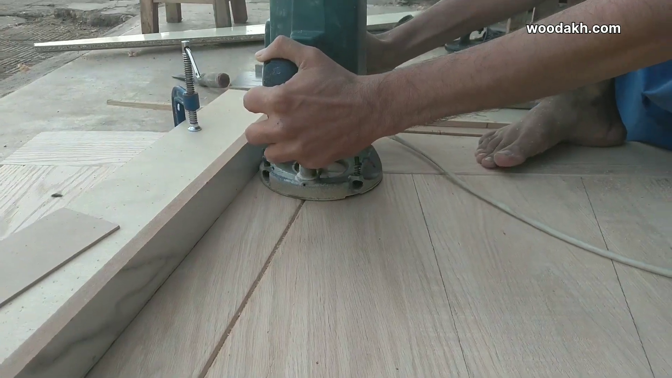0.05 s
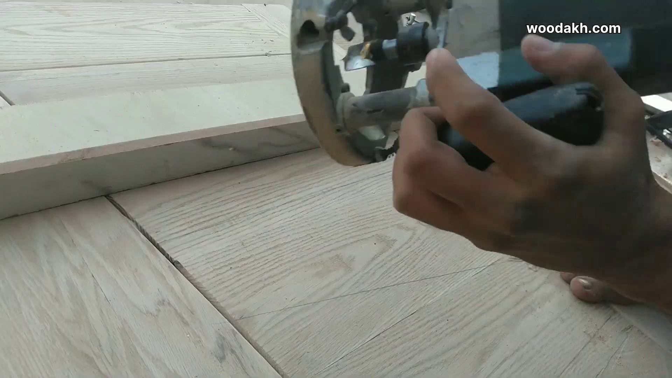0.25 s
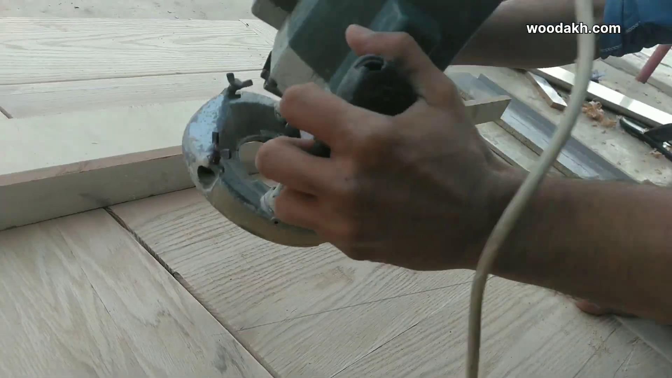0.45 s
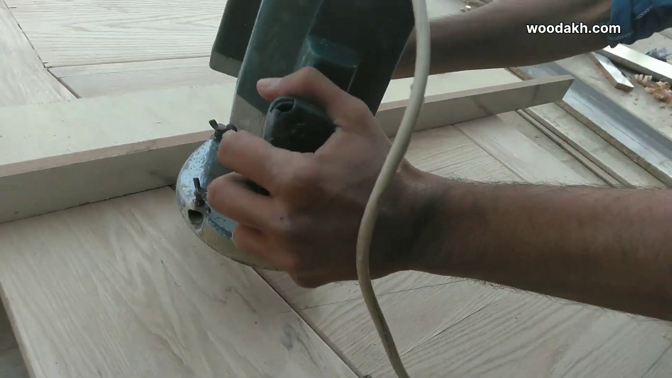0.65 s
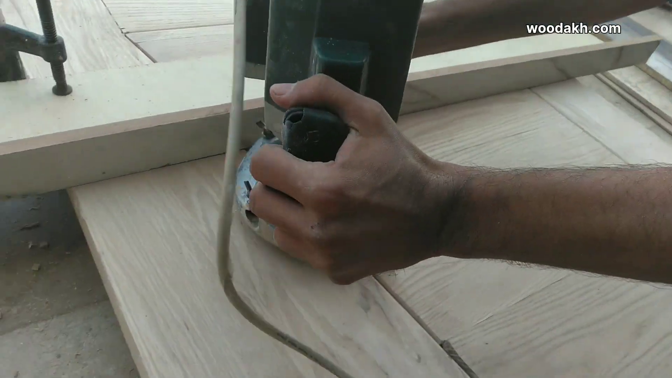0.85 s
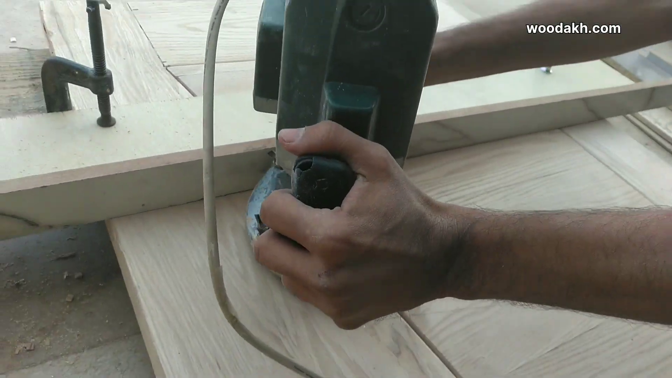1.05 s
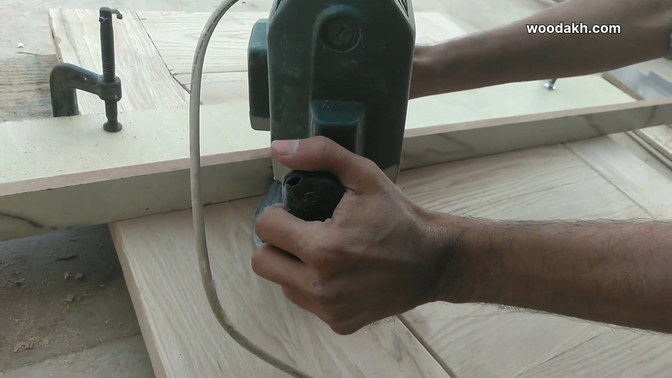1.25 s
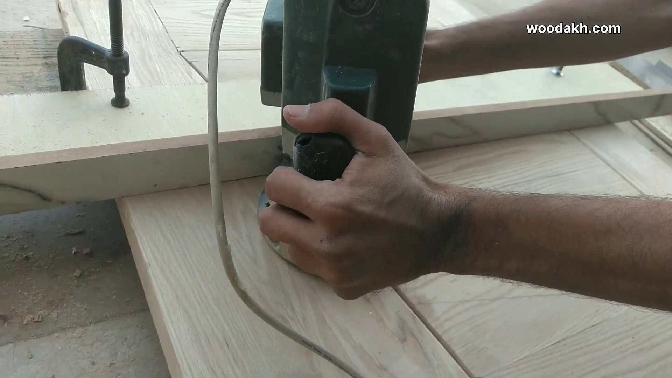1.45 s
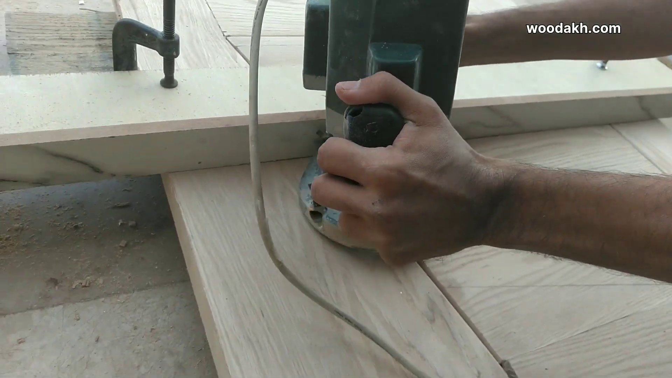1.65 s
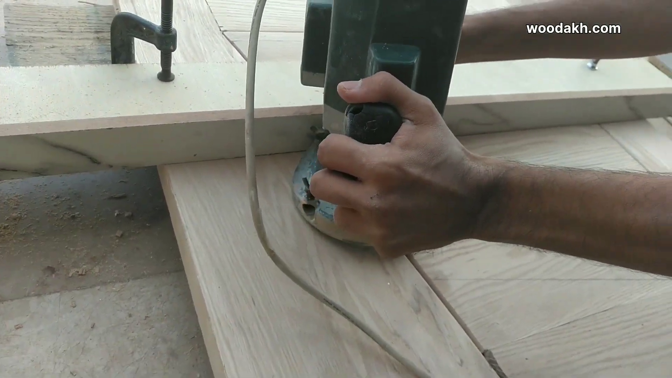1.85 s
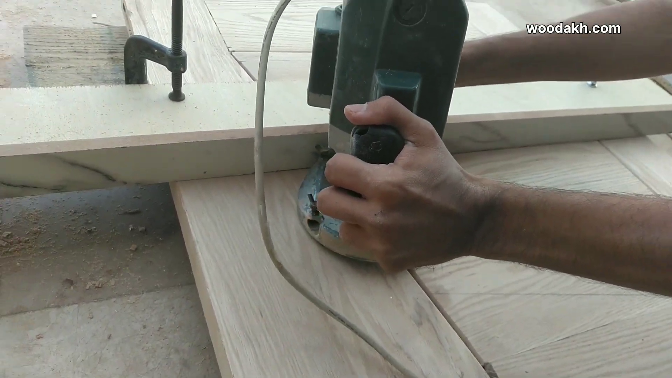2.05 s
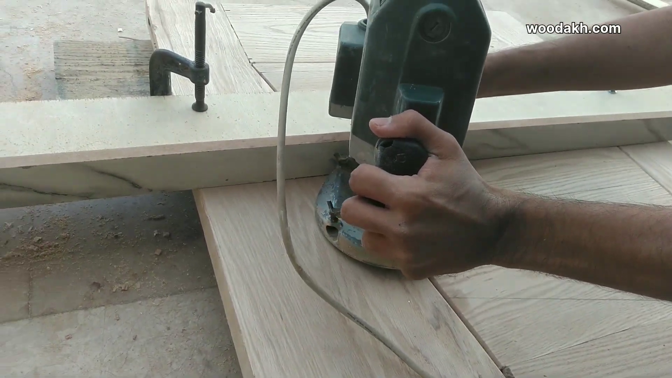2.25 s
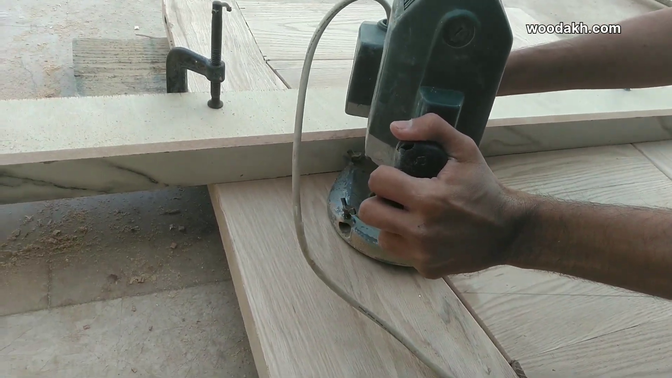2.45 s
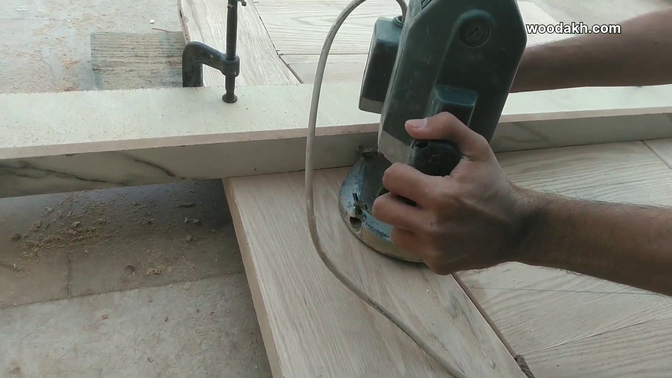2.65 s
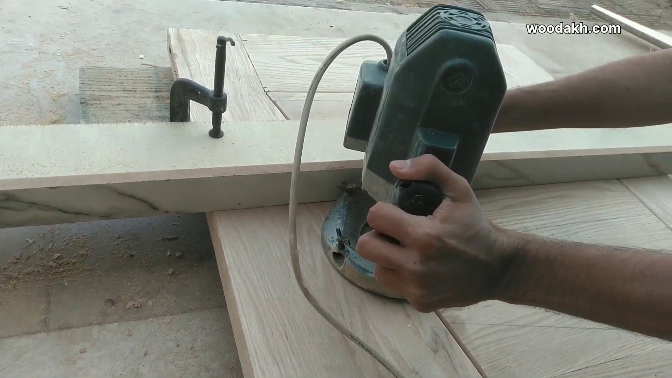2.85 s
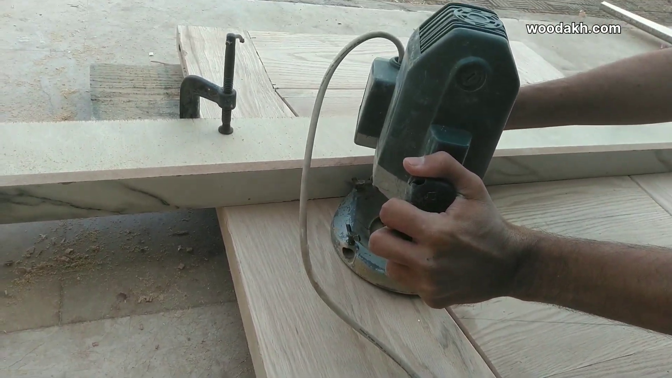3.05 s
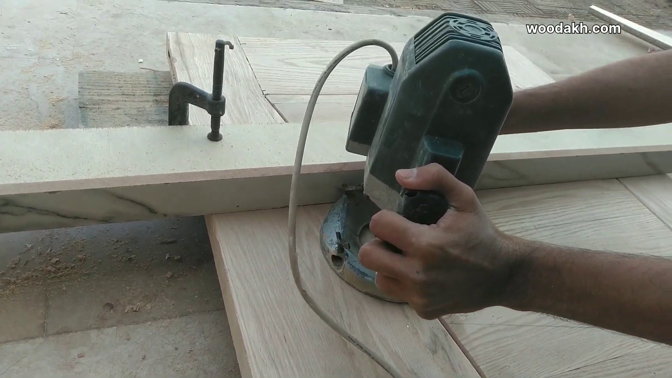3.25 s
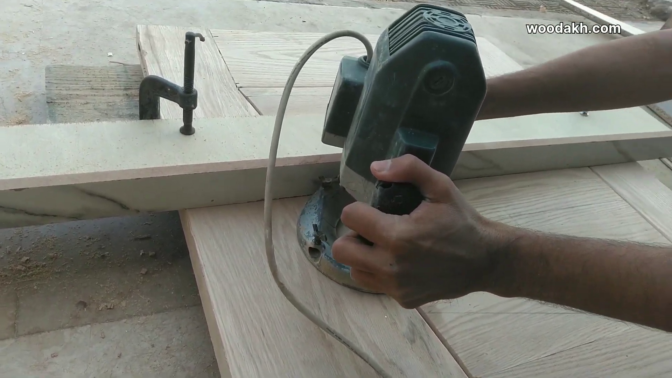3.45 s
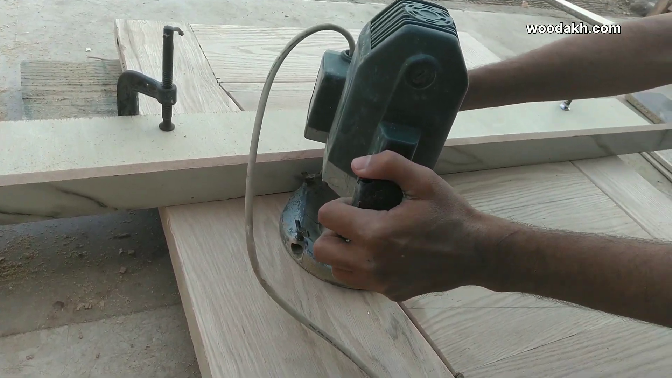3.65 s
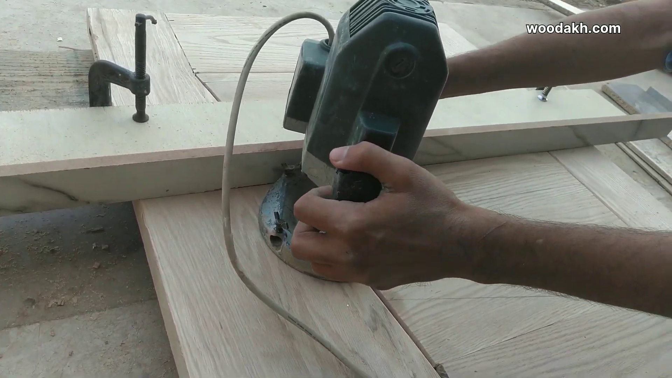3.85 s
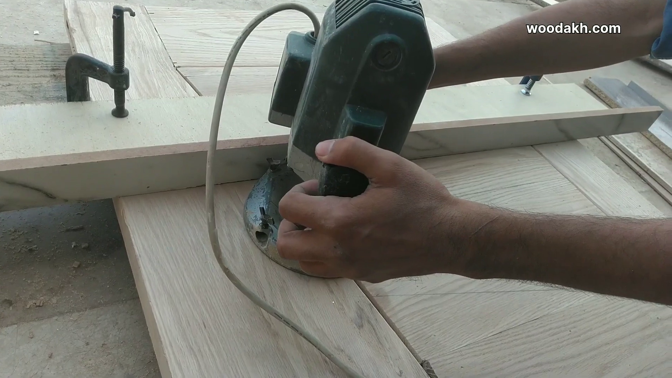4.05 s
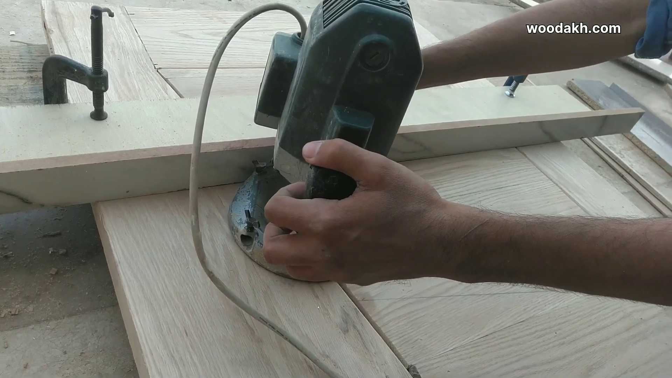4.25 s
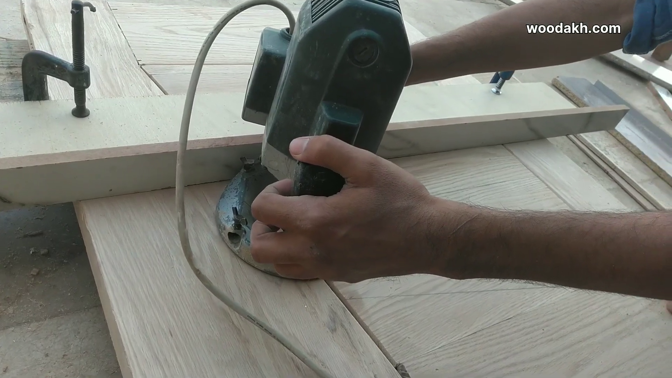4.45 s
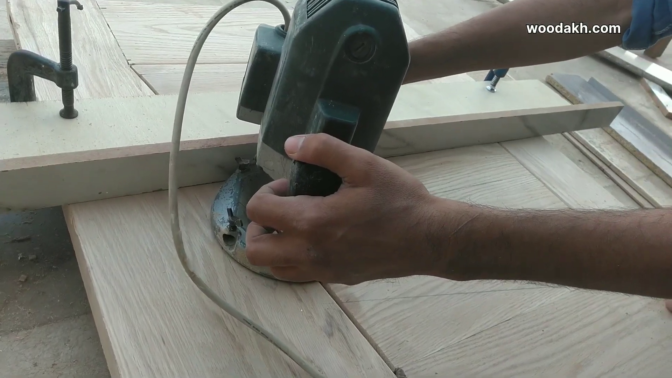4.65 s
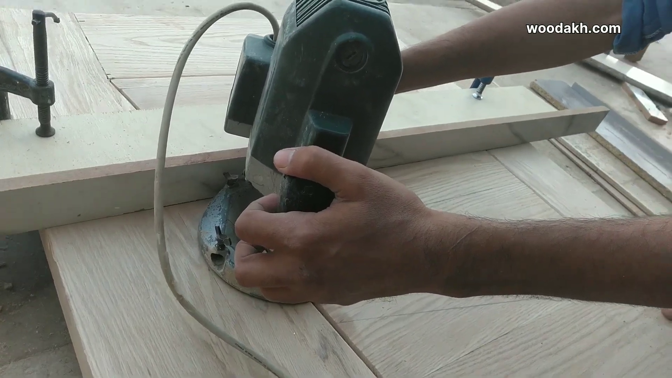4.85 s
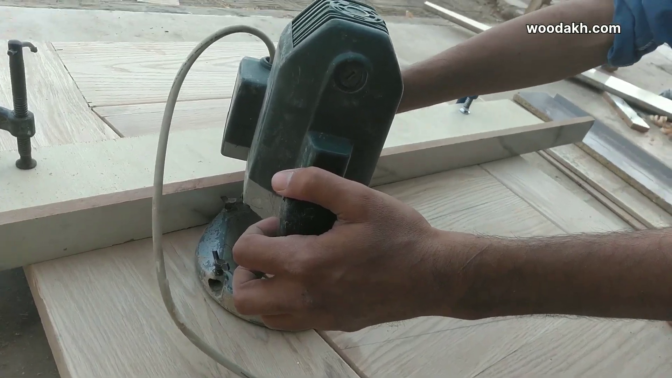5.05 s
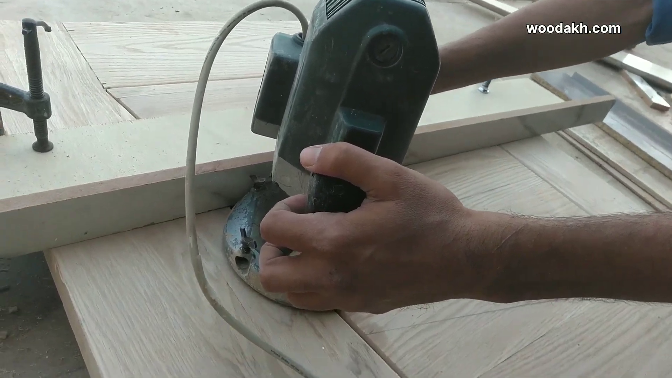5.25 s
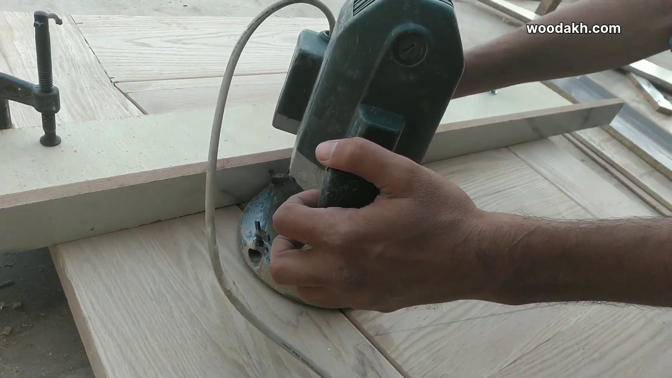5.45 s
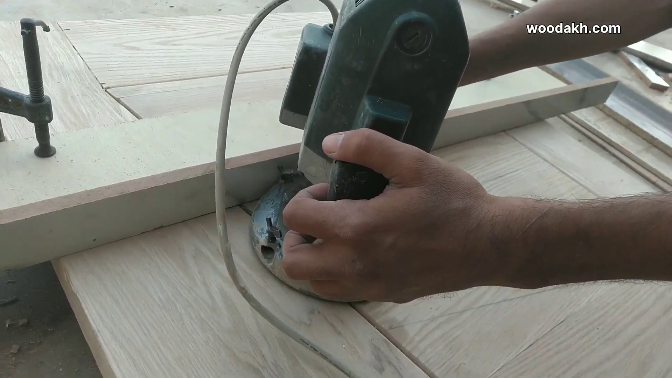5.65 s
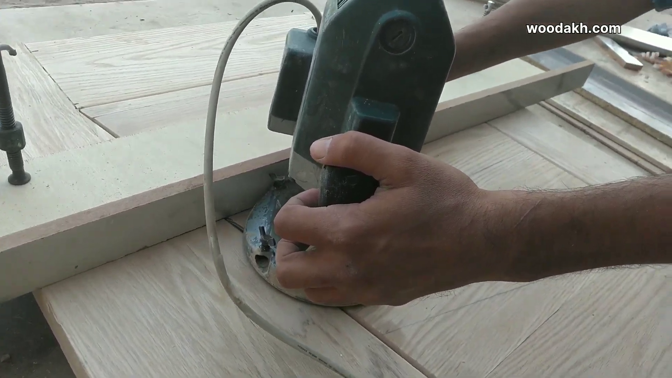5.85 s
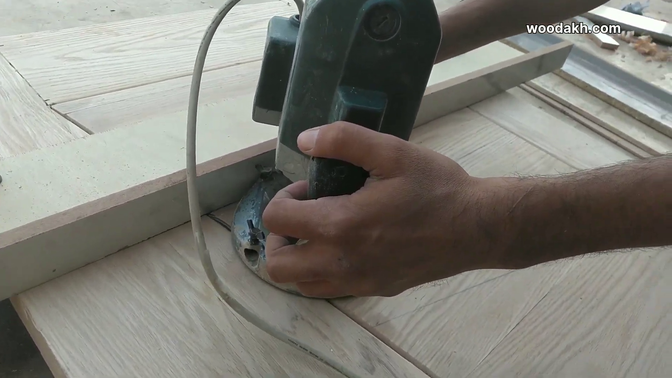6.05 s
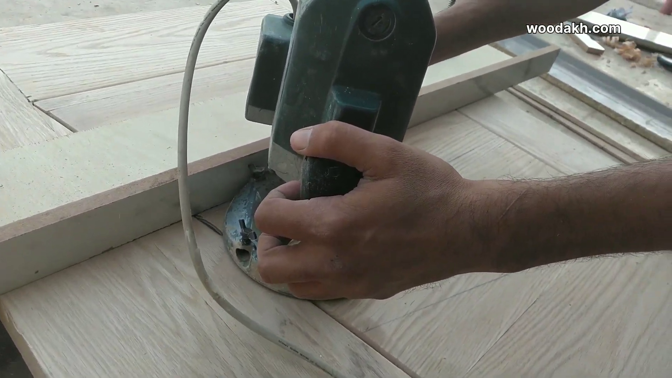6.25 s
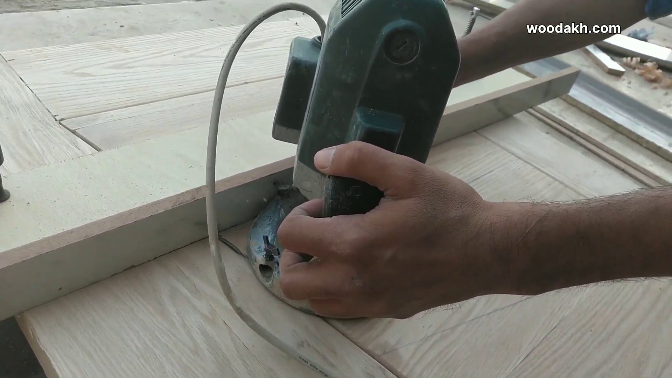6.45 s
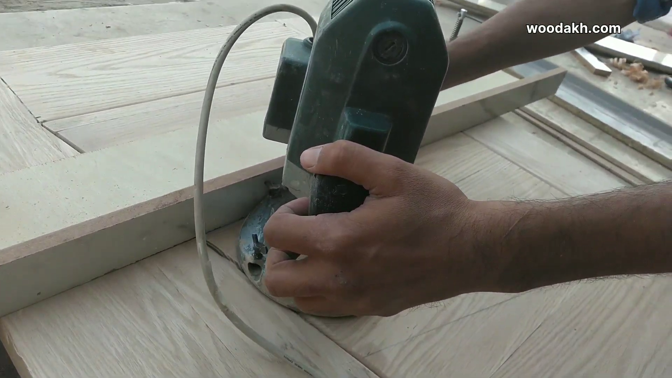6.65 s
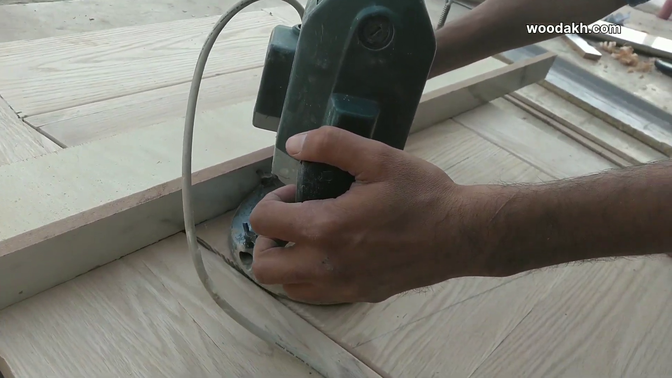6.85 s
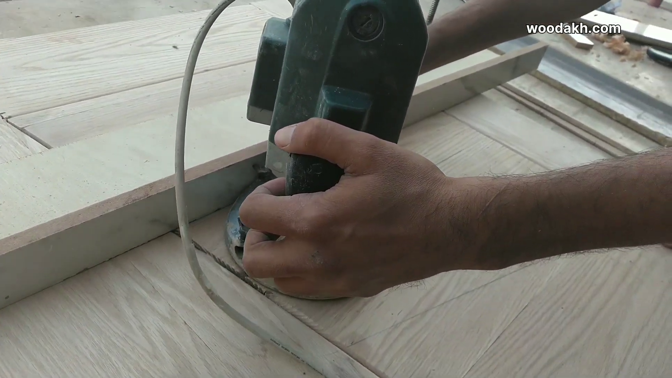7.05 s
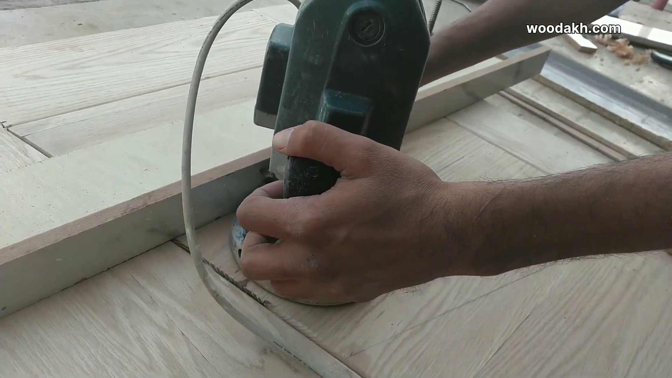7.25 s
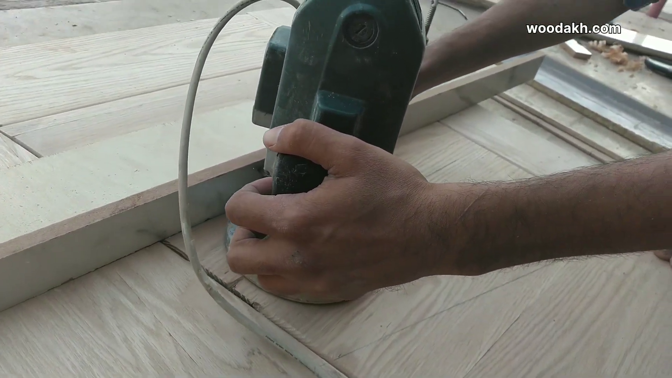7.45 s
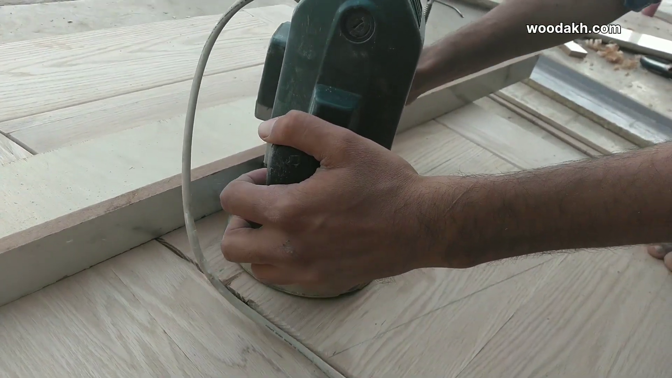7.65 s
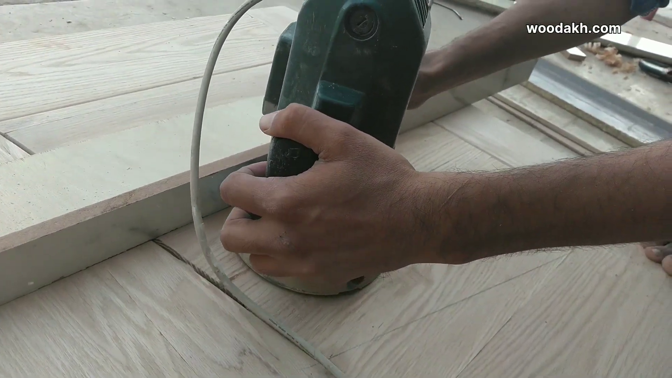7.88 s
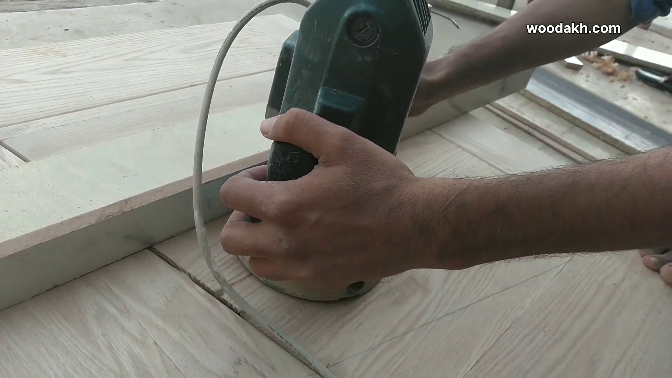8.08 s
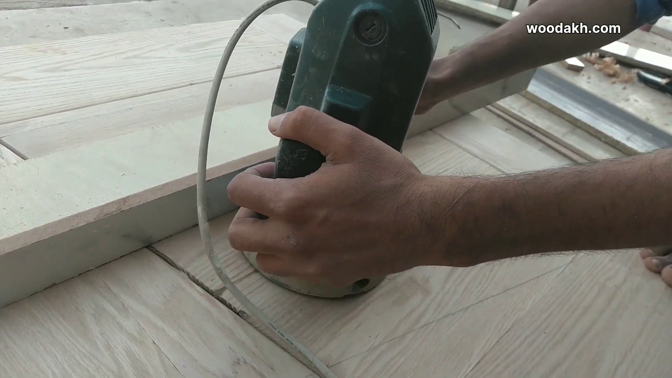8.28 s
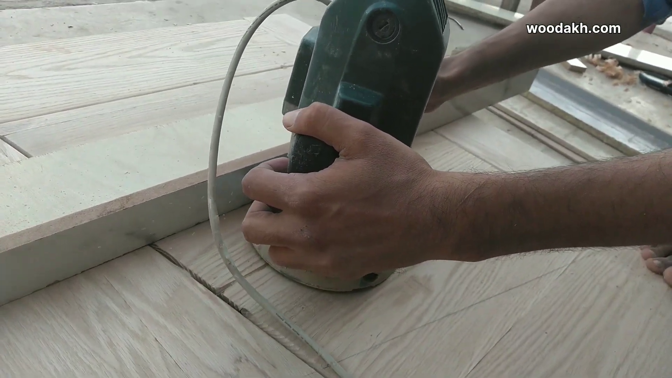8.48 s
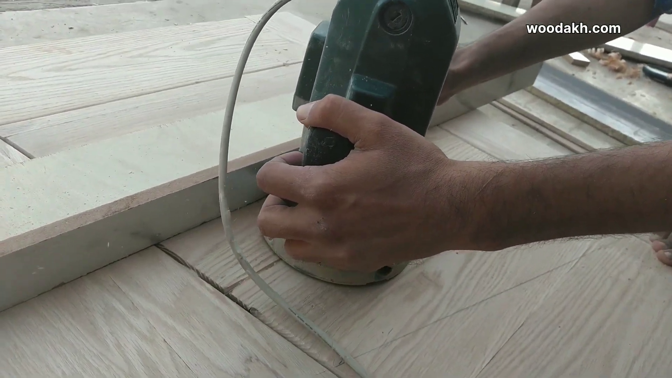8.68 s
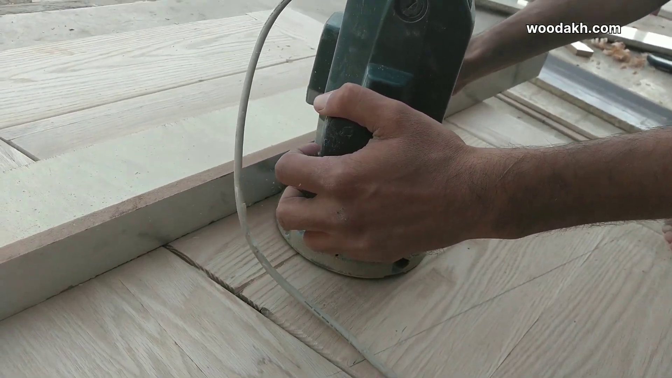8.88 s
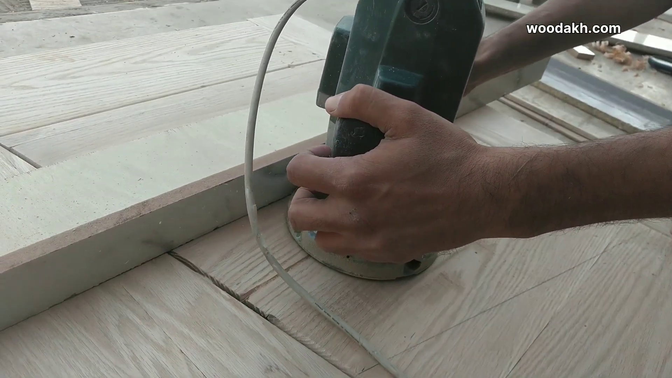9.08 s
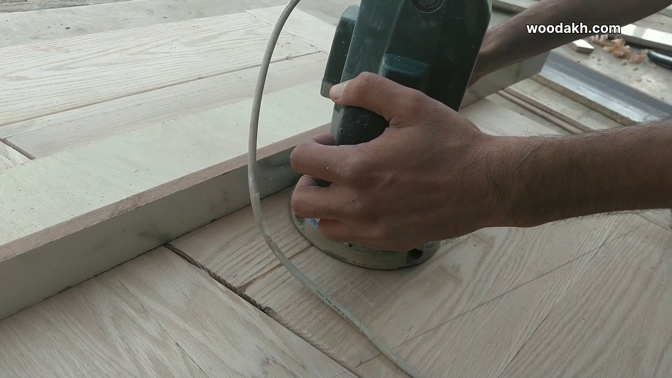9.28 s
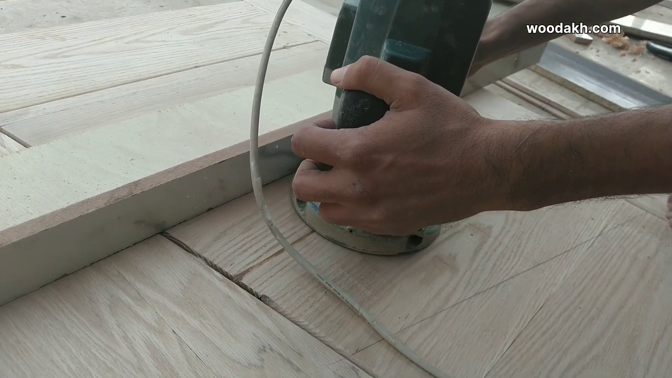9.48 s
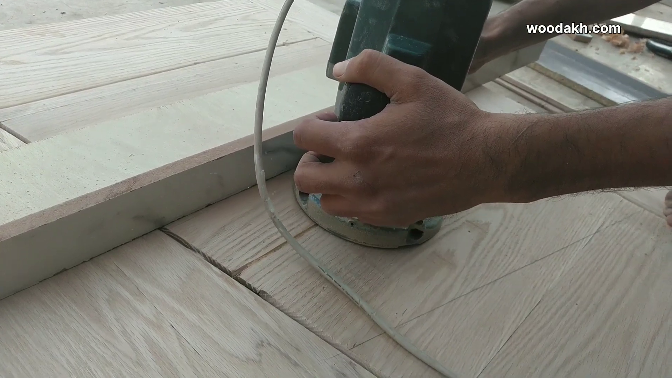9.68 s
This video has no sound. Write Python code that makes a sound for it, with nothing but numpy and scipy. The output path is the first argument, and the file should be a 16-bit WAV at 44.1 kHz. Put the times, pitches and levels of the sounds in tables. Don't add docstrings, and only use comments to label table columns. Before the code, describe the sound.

A fraction of a second of loud running router cuts abruptly to a quiet outdoor yard with low rumble and soft air. The base scrapes and knocks on a board, a switch clicks, and the motor spins up quickly to a harsh whine with rushing fan air. It plunges into wood, gains a buzzing edge, then grooves steadily while its pitch slowly sags. Close stereo microphones.

```python
import sys
import numpy as np
from scipy import signal
from scipy.fft import rfft, irfft, next_fast_len
from scipy.io import wavfile
from scipy.ndimage import uniform_filter1d, map_coordinates

SR = 44100
rng = np.random.default_rng(int(sys.argv[2]) if len(sys.argv) > 2 else 0)


def gain_from_decibels(decibels):
    exponent = np.asarray(decibels, float) / 20
    return 10 ** exponent


def pcm_store(signal):
    levels = np.round(np.clip(np.atleast_2d(signal), -1, 1) * 32767)
    wavfile.write(sys.argv[1], SR, levels.astype(np.int16).T)


N = 428652
TIME = np.arange(N) / SR

CUT_S, START_S = 0.236, 1.691
PLUNGE_FROM_S, PLUNGE_IN_S, PLUNGE_OUT_S, GROOVE_S = 3.273, 3.4, 3.71, 4.35
BALL_PASS = 3.655


# missing_turns_per_s, time_constant_s
RUN_UP = [(183.5, .73), (140, .11)]
# time_s, lost_turns_per_s
LOAD_SAG = [(0, 7.7), (.24, 6.8), (1.69, 0), (3.3, 0), (3.5, 2.4), (3.75, 4.9), (4.0, 5.9), (4.3, 6.1),
            (5.2, 4.9), (5.8, 4.5), (6.4, 6.1), (7.0, 8.6), (7.6, 10.7), (8.2, 11.4), (8.8, 13.1),
            (9.1, 15.1), (9.72, 19.2)]
LEFT_SHIFT = [
    (.12, .13, .13, .125, .013),
    (-1, -3.4, -1.76, -1.8, .2),
]
# time_s, turn_rad, half_length_s
SIXTH_SWINGS = [
    (3.36, -1, .1),
    (9.5, 3.4, .6),
]
BEAT_DB = [
    (-18.5, -23.5, -45, -31, 0.52),
    (-29, -28, -27.5, -24, 0.12),
    (-33, -41, -34.5, -26.5, 0.67),
    (-24, -35.5, -29, -29, 2.5),
]
BEAT_PAN = [
    (6, 5, 3, 10.5, -0.9),
    (-3, 6, 6.3, 4.8, -0.8),
    (7, 8, 5.5, 10.7, -0.45),
    (-4, 7, 11.4, 1.1, 0.6),
]
BEAT_PHASE = [
    (0, 0, 1.1, 0, .03),
    (0, 1.4, 2, 0.55, -0.046),
    (0, 0, 0, 0, -.06),
    (0, 0.14, 0, -0.12, 0.0055),
]
BEAT_GROWTH = [55, 95, 40, 40]
BEAT_SWELLS = {1: [(1.93, 10, 0.066), (2.06, -12, .04), (2.75, 2.5, 0.32), (3.2, -5, 0.17),
               (4.35, 0.5, 0.13), (6.5, -4, 1)], 2: [(4.95, 4, 0.26), (6.2, -5, 0.29), (6.95, 3, 0.1),
               (8.1, -2, 0.27), (9.1, 2, 0.25), (9.6, 2.5, 0.11), (2.1, -2, 0.18)], 3: [(3.2, 13.5, 0.16),
               (3.9, 6.5, 0.19), (4.3, -8, 0.26), (4.9, 1.5, 0.49), (5.6, -3, 0.21), (9.7, -11, 0.14)],
               4: [(3.2, 9, 0.22), (3.95, 3, 0.13), (6.25, 8, 0.6), (6.9, 4, 0.21), (8.3, -4, 0.2),
               (8.7, 1.5, 0.21), (9.4, 4.5, 0.22)]}
WHINE_DB = [
    (-45, -38, -31, -31, .5),
    (-45, -45, -15, -29, -.8),
    (-34, -37, -38, -27, -4.5),
    (-42, -40, -28.5, -39, .2),
]
# time_s, level_db, half_length_s
WHINE_SWELLS = [
    [(3.4, -8, .06), (4.25, -8, .2), (5.6, 8, .4), (8.65, 4, .3), (9.5, -8, .3)],
    [(3.29, 15, .07), (3.88, -3, .15), (6.3, -4, .4), (7.4, 8, .2), (9.33, 8, .15), (9.72, 7, .08)],
    [(3.12, 8, .1), (3.5, 5, .08), (6.0, 4, .3), (6.8, 8, .4)],
    [(6.2, 5, .2), (3.4, 3, .08)],
]
FLUTE_ORDERS = [7, 8, 9, 10, 11, 12, 13, 14, 15, 16, 17, 18, 20, 24]
FLUTE_DB = [-5, -2, -4, 3, -3, -2, -4, -1, -5, 1, -5, -2, -6, -5]
FLUTE_PHASE = [0, -1, 0, 1.9, 3.1, 3.2, 1.5, -.8, 0, 0, 0, -2.8, 0, 0]
BEARING_LINES = [(1, 0), (0, 1.62), (1, 2), (1, 1.62), (3, 0), (6, 0), (8, 0), (9, 0), (10, 0), (11, 0)]
BEARING_DB = [-41, -43, -42, -39, -41, -45, -42, -47, -50, -50]
BEARING_CALMS = (0, 0, 0, 0, -1.3)

NOISE_DB = [
    (-25, -27, -30, -28, 0.26),
    (-20.5, -18.5, -21, -18, -0.028),
    (-23.5, -22, -22.5, -21.5, -0.082),
    (-20, -21, -24.5, -20.5, -0.97),
]
NOISE_GROWTH = [9.5, 18, 25, 34]
NOISE_FULL_SPEED = [259, 260, 130, 110]
EASE_DB = [-2, -4, -4.5, 1]
EASE_PAN = [-7, -3]
HISS_PAN = (-12, -9, -7, -10.5, 0.14)
FAN_PAN = (3, -1.2, -1.2, -0.3, -0.15)
BOARD_ECHO = [
    (0.232, 0.226, 0.226, 0.2195, 0.0018),
    (0.225, 0.209, 0.199, 0.2147, 0.005),
]
# freq_hz, level_db_per_hz
HOUSING_COLOUR = [(120, -32), (270, -15.5), (310, -12), (550, -7), (900, -3.5), (1500, -1), (2200, -0.5),
                  (2800, -10), (4000, -13.5)]
# freq_hz, level_db_per_hz
FAN_COLOUR = [(1500, -27.5), (2300, -1), (2800, -3), (3300, -2), (4300, -4), (5500, -2), (6500, 0),
              (7200, -20), (9000, -31)]
# freq_hz, level_db_per_hz
HISS_COLOUR = [(5500, -38), (6800, -2.5), (8000, 0.5), (9300, -4), (10300, -4.5), (11200, -44),
               (12500, -65)]
# freq_hz, level_db_per_hz
CHIP_COLOUR = [(9000, -42), (10500, 3), (11300, -1), (12500, -7.5), (14400, -5), (15700, -1), (16500, -3.5)]

# freq_hz, level_db_per_hz
SCRAPE_COLOUR = [(410, -45), (700, -10), (1180, -15), (1340, -8), (1860, -6.5), (3630, -9), (6000, -16.5),
                 (7800, -53), (13200, -120)]
# freq_hz, level_db_per_hz
DUST_COLOUR = [(3530, -49), (6000, -16), (7120, 1), (8340, -1), (9030, -2), (10100, -5), (12000, -11),
               (15500, -12)]
# start_s, peak_db, pitch_hz, fade_60db_s
BUMPS = [
    (1.189, -28, 113, 0.04),
    (1.307, -22, 226, 0.048),
    (1.549, -17.5, 162, 0.04),
    (1.571, -14, 121, 0.044),
    (1.587, -18, 125, 0.035),
    (4.429, -24, 215, 0.035),
    (4.5, -20, 113, 0.04),
]
# freq_hz, level_db_per_hz
RUMBLE_COLOUR = [(15, -63), (25, -64), (73, -5.5), (134, -1), (249, -8.5), (309, -6.5), (353, -8.5),
                 (450, -10), (580, -65.5), (990, -120)]
# freq_hz, level_db_per_hz
AIR_COLOUR = [(210, -28), (350, 0.5), (429, -13), (699, 0.5), (756, -6.5), (1420, -2.5), (2580, -8),
              (2830, -8), (3020, -9), (6620, -13), (9970, -21.5), (15000, -33)]
# time_s, level_db, half_length_s
GUSTS = [
    (1.57, 6, 0.037),
    (1.84, 11, 0.059),
    (2.0, 5, .15),
    (4.46, 7, 0.13),
    (4.85, 6.5, 0.35),
    (8.9, 1.5, 0.23),
]


def shaft():
    free_speed = 340
    since_switch = np.abs(TIME - START_S)
    missing = sum(turns * np.exp(-since_switch / lag_s) for turns, lag_s in RUN_UP)
    sag = uniform_filter1d(curves(LOAD_SAG)[0], size=4000)
    return free_speed - missing * (TIME > CUT_S) - sag


def running():
    return np.clip((CUT_S - TIME) / 0.0019, 0, 1) + np.clip((TIME - START_S) / 0.00318, 0, 1)


def spindle():
    speed = shaft() * (1 + 0.000376 * wobble(30))
    angle = 2 * np.pi * np.cumsum(speed) / SR
    lag_s = staged(LEFT_SHIFT[0]) / 1000
    angle = angle - 2 * np.pi * speed * left_only(lag_s)
    return shaft_beats(speed, angle) + whines(speed, angle) + bearing_and_fan(speed, angle) + inrush(speed, angle)


def shaft_beats(speed, angle):
    decades = np.log10(np.minimum(speed / 310, 1))
    slack_db = 13 * np.clip(1 - speed / 290, 0, 1)
    beats = 0
    for i, order in enumerate(BEAT_SWELLS):
        level_db = staged(BEAT_DB[i]) + swells(BEAT_SWELLS[order]) + BEAT_GROWTH[i] * decades
        level_db = level_db + 2.0 * wobble(9) + slack_db * wobble(14.4)
        phase = left_only(staged(BEAT_PHASE[i]))
        beats = beats + sides(staged(BEAT_PAN[i])) * line(angle, order, level_db, phase)
    return beats


def whines(speed, angle):
    growth_db = 60 * np.log10(np.minimum(speed / 310, 1))
    fifth_db, sixth_db, bearing_db, bite_db = [staged(row) + swells(more) + growth_db
                                               for row, more in zip(WHINE_DB, WHINE_SWELLS)]
    sixth_turn = staged(LEFT_SHIFT[1]) + swells(SIXTH_SWINGS)
    whine = line(angle, 5, fifth_db + 2.1 * wobble(8), left_only(-1.3))
    whine = whine + line(angle, 6, sixth_db + 2.1 * wobble(8), left_only(sixth_turn))
    bearing_phase = left_only(1.5 * wobble(8))
    whine += sides(-9) * line(angle, 7 * BALL_PASS, bearing_db + 2.1 * wobble(6), bearing_phase)
    until_groove = staged((1, 1, 1, 0, 0))
    for order, db, phase in zip(FLUTE_ORDERS, FLUTE_DB, FLUTE_PHASE):
        whine += roaming_line(angle, order, db + bite_db + 2.1 * wobble(4), phase * until_groove)
    return whine


def bearing_and_fan(speed, angle):
    effort_db = 30 * np.log10(speed / 330)
    rattle_db = effort_db + staged(BEARING_CALMS)
    tones = 0
    for (multiple, turns), db in zip(BEARING_LINES, BEARING_DB):
        order = multiple * BALL_PASS + turns
        tones = tones + roaming_line(angle, order, db + rattle_db + 3.1 * wobble(3))
    blades, blade_db = 14, -30
    tones += roaming_line(angle, blades, blade_db + effort_db + 2.1 * wobble(5))
    ring_hz, ring_db, half_width_hz = 1030, -33, 130
    ring = gain_from_decibels(ring_db) * swells([(ring_hz, 1, half_width_hz)], BALL_PASS * speed)
    return tones + ring * line(angle, BALL_PASS, 1.8 * wobble(16))


def inrush(speed, angle):
    slots = 16
    throb = (1 + np.cos(angle)) ** 2 / 2
    level_db = -33 + 20 * np.log10(speed / 200)
    level_db = level_db + swells([(2060, 20, 260)], slots * speed)
    level_db = level_db - 120 * np.maximum(TIME - 2.0, 0) ** 2
    return (TIME > CUT_S) * throb * line(angle, slots, level_db)


def airflow():
    speed = shaft()
    ease = swells([(9.7, 1, 0.45)])
    housing_db, fan_db, hiss_db, chips_db = [
        staged(row) + growth * np.log10(np.minimum(speed / full, 1)) + change * ease
        for row, growth, full, change in zip(NOISE_DB, NOISE_GROWTH, NOISE_FULL_SPEED, EASE_DB)]
    chips_db = chips_db + swells([(1.94, 3.1, 0.2)])
    hiss_pan = staged(HISS_PAN) + EASE_PAN[0] * ease
    fan_pan = staged(FAN_PAN) + EASE_PAN[1] * ease
    lag_ms = staged(LEFT_SHIFT[0])
    load_db = 0.26 * wobble(9) + 0.39 * wobble(25)

    housing = rush(HOUSING_COLOUR, 0.28, lag_ms, patchy_db=1.7, bands_db=2.35)
    housing = sides(2.0) * gain_from_decibels(housing_db + 9 + load_db) * housing
    fan = rush(FAN_COLOUR, 0.037, lag_ms, patchy_db=1.5, bands_db=2.5)
    fan = sides(fan_pan) * gain_from_decibels(fan_db + 2.5 + load_db) * fan
    hiss = rush(HISS_COLOUR, 0.11, lag_ms, patchy_db=1.0, bands_db=1.5)
    hiss = sides(hiss_pan) * gain_from_decibels(hiss_db + 1.5 + load_db) * hiss
    chips = rush(CHIP_COLOUR, 0.069, lag_ms, patchy_db=1.0, bands_db=2.5)
    chips = gain_from_decibels(chips_db + 2.5 + load_db) * chips

    direct = fan + hiss + chips
    echo = np.array([late(side, staged(row)) for side, row in zip(direct, BOARD_ECHO)])
    board = 0.43
    return housing + (direct + board * echo) / np.hypot(1, board)


def handling():
    return sliding() + bumps_and_switch()


def sliding():
    slide_from_s, slide_to_s, fade_db_s = 0.81, 1.675, 500
    outside_s = np.maximum(slide_from_s - 0.13 - TIME, 0) + np.maximum(TIME - slide_to_s, 0)
    fade_db = -fade_db_s * outside_s
    scrape_db = -36.5 - 8 * (TIME < slide_from_s) + 2.4 * wobble(8.3) + fade_db
    scrape = gain_from_decibels(scrape_db) * rush(SCRAPE_COLOUR, 0.59, -0.2, patchy_db=3.5)

    dust_at_s, hold_s, rise_db_s, fall_db_s = 0.95, 0.16, 300, 72
    puff_db = -35.5 - rise_db_s * np.maximum(dust_at_s - TIME, 0)
    puff_db = puff_db - fall_db_s * np.maximum(TIME - dust_at_s - hold_s, 0)
    dust_level = gain_from_decibels(puff_db) + gain_from_decibels(-50.5 + fade_db) * (TIME > dust_at_s)
    return scrape + gain_from_decibels(5.5) * dust_level * rush(DUST_COLOUR, 0.35, -0.22, patchy_db=4.5)


def bumps_and_switch():
    hits = np.zeros((2, N + SR))
    t = np.arange(SR // 5) / SR
    for start_s, db, hz, t60 in BUMPS:
        ring = np.sin(2 * np.pi * hz * t) + 0.58 * np.sin(2 * np.pi * 2.43 * hz * t)
        onset = 1 - np.exp(-t / 0.0015)
        first = round(start_s * SR)
        hits[:, first:first + len(t)] += gain_from_decibels(db - 60 * t / t60) * onset * ring
    click_db, click_t60 = -15, 0.012
    snap = np.diff(rng.standard_normal((2, len(t) + 1)))
    first = round(START_S * SR)
    hits[:, first:first + len(t)] += gain_from_decibels(click_db - 60 * t / click_t60) * snap
    return hits[:, :N]


def yard():
    duck_db = -5.5 * np.clip((TIME - START_S) / 0.078, 0, 1)
    rumble_db = -38.5 + duck_db + swells(GUSTS) + 1.6 * wobble(3.9)
    rumble = gain_from_decibels(rumble_db) * rush(RUMBLE_COLOUR, 0.9, 0, patchy_db=3.0)
    air = gain_from_decibels(-36.5) * rush(AIR_COLOUR, 0.41, -0.26, patchy_db=3.0)
    return rumble + air


def line(angle, order, db, phase=0):
    return np.sqrt(2) * gain_from_decibels(db) * np.sin(order * angle + phase + rng.uniform(0, 2 * np.pi))


def roaming_line(angle, order, db, phase=0):
    phase = left_only(phase + 0.5 * wobble(5))
    return sides(4 * wobble(1.5)) * line(angle, order, db, phase)


def left_only(x):
    return np.array([[1], [0]]) * x


def sides(pan_db):
    return gain_from_decibels(np.array([[0.5], [-0.5]]) * pan_db)


def rush(colour, alike, lag_ms, patchy_db, bands_db=0):
    z = signal.stft(rng.standard_normal((3, N)), nperseg=512)[2]

    def patches(bins, frames):
        field = uniform_filter1d(rng.standard_normal(z.shape[1:]), bins, axis=0)
        return unit(uniform_filter1d(field, frames, axis=1))

    field_db = patchy_db * patches(bins=3, frames=7) + bands_db * patches(bins=3, frames=60)
    white = signal.istft(z * gain_from_decibels(field_db), nperseg=512)[1][:, :N]
    size = next_fast_len(N + 8192)
    hz, db = np.transpose(colour)
    gain = gain_from_decibels(np.interp(np.log(np.fft.rfftfreq(size, 1 / SR) + 1), np.log(hz), db))
    shared, *own = irfft(rfft(white, size) * gain, size)[:, :N]
    alike = np.clip(alike, 0, 1)
    both = np.array([late(shared, lag_ms), shared])
    return unit(np.sqrt(alike) * both + np.sqrt(1 - alike) * np.array(own))


def late(x, ms):
    return map_coordinates(x, [np.arange(N) - ms * SR / 1000], order=3)


def staged(row):
    before, free, plunge, groove, drift = row
    end_s = N / SR
    times = [CUT_S, START_S, PLUNGE_FROM_S, PLUNGE_IN_S, PLUNGE_OUT_S, GROOVE_S, end_s]
    last = groove + drift * (end_s - GROOVE_S)
    return np.interp(TIME, times, [before, free, free, plunge, plunge, groove, last])


def swells(rows, x=TIME):
    return sum(height * np.exp(-((x - at) / width) ** 2) for at, height, width in rows)


def curves(rows):
    s, *columns = np.transpose(rows)
    return [np.interp(TIME, s, column) for column in columns]


def wobble(rate):
    knots = rng.standard_normal(int(N * rate / SR) + 4)
    return map_coordinates(knots, [np.arange(N) * rate / SR], order=1)


def unit(x):
    return x / np.sqrt(np.mean(x ** 2) + 1e-20)


def scene():
    return running() * (spindle() + airflow()) + handling() + yard()


def lose_weak_bands(x):
    margin_db, treble_db, loss_db = -3.0, 1.3, -30
    hz, _, z = signal.stft(x, SR, nperseg=1024)
    power = np.mean(np.abs(z) ** 2, axis=0)
    power = uniform_filter1d(uniform_filter1d(power, size=4, axis=0), size=2, axis=1)
    level = np.log(power + 1e-14)
    ceiling = uniform_filter1d(level, size=61, axis=0) + 0.4
    around = uniform_filter1d(np.minimum(level, ceiling), size=61, axis=0)
    limit_db = margin_db + treble_db * np.clip((hz[:, None] - 9000) / 1500, 0, 1)
    weak = (level < around + np.log(gain_from_decibels(2 * limit_db))) & (hz[:, None] > 1400)
    return signal.istft(z * np.where(weak, gain_from_decibels(loss_db), 1), SR, nperseg=1024)[1][:, :N]


def band_limit(x):
    return signal.sosfilt(signal.butter(12, 16570, fs=SR, output="sos"), x)


def record(dry):
    top_hz = 15760
    kept = lose_weak_bands(np.clip(dry, -1, 1))
    mix = irfft(rfft(kept) * (np.fft.rfftfreq(N, 1 / SR) < top_hz), N)
    return band_limit(mix)


dry = scene()
out = record(dry)
pcm_store(out)
```